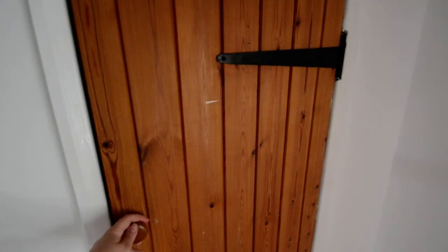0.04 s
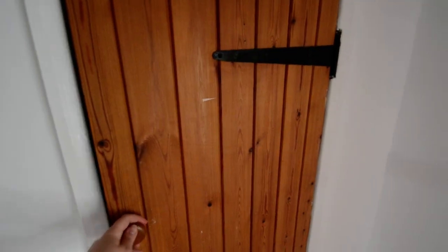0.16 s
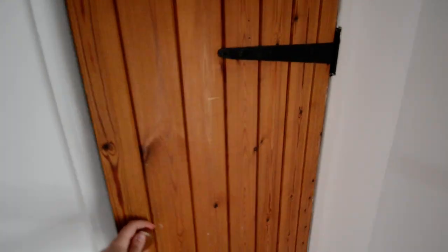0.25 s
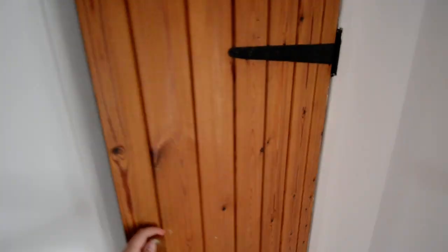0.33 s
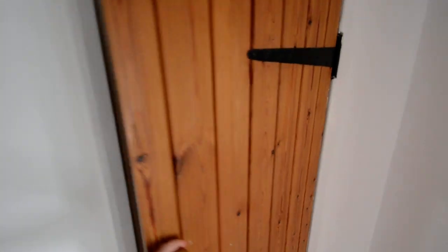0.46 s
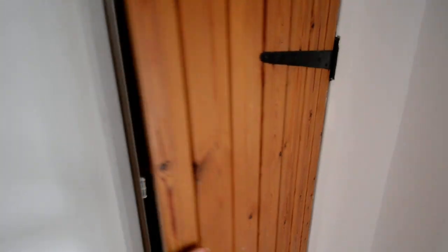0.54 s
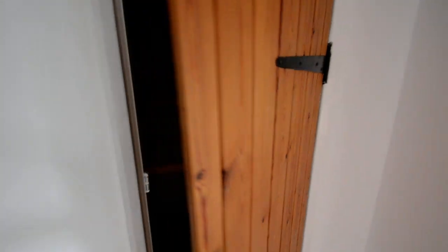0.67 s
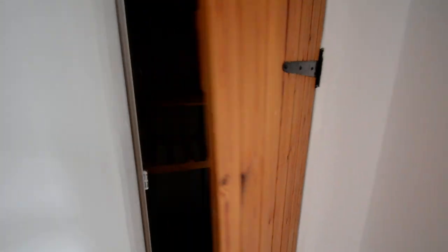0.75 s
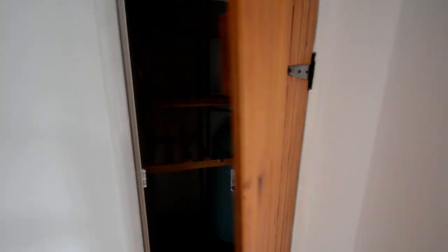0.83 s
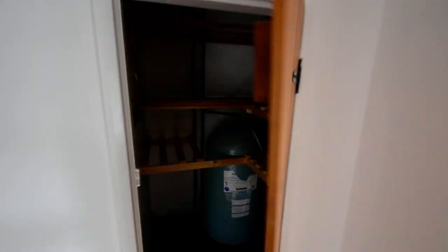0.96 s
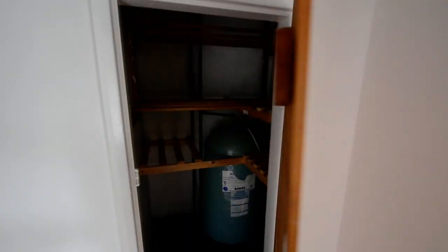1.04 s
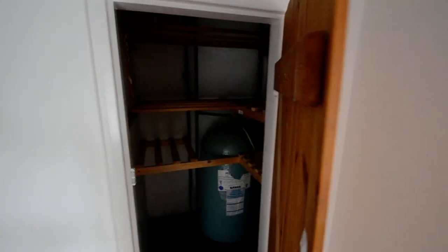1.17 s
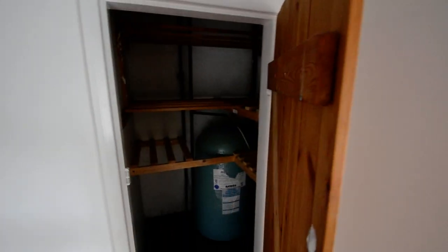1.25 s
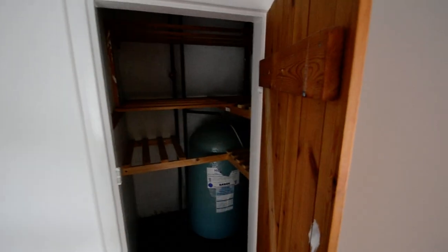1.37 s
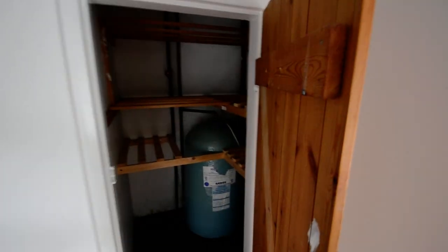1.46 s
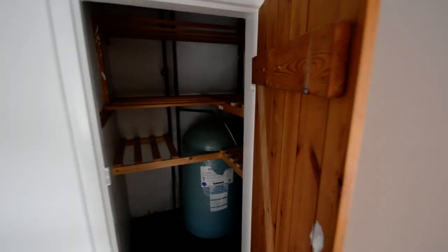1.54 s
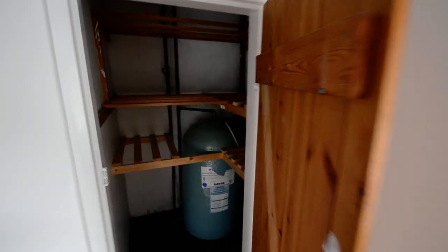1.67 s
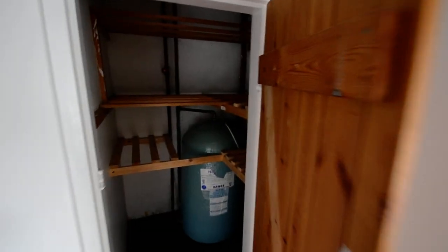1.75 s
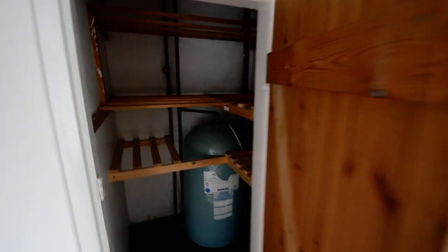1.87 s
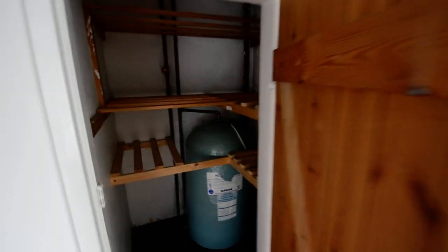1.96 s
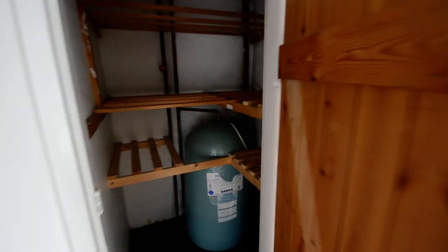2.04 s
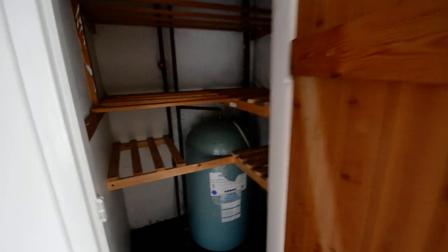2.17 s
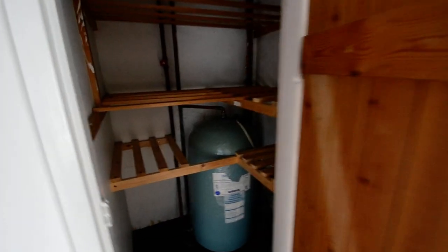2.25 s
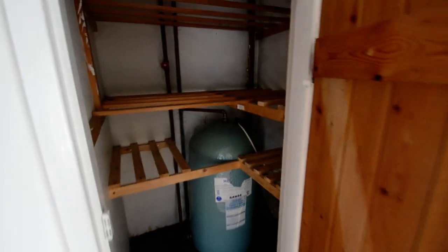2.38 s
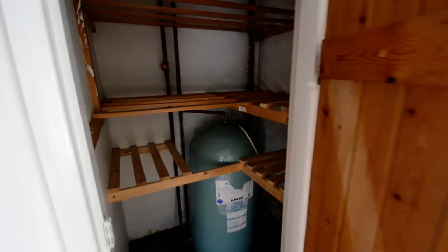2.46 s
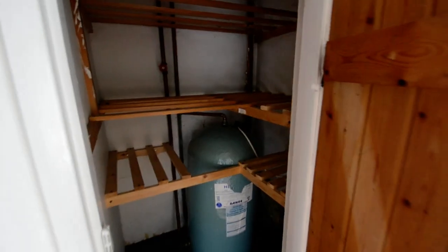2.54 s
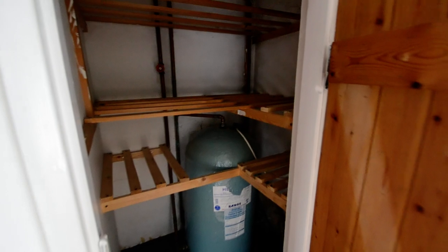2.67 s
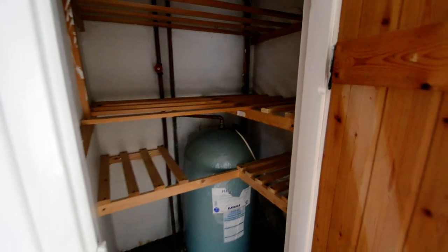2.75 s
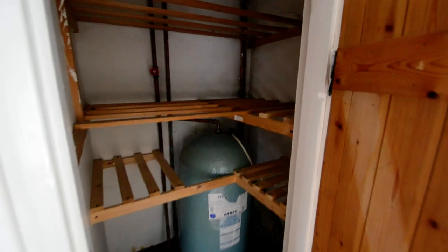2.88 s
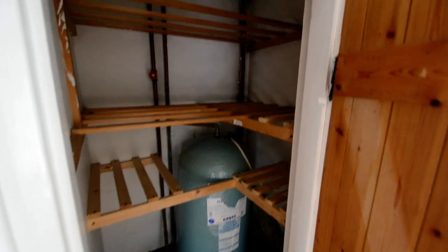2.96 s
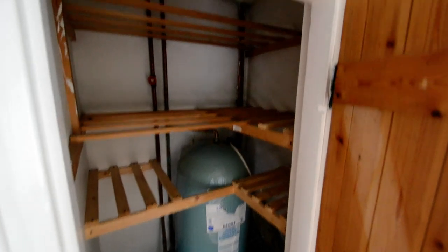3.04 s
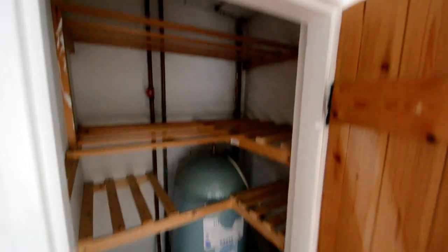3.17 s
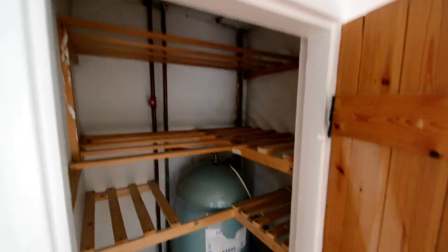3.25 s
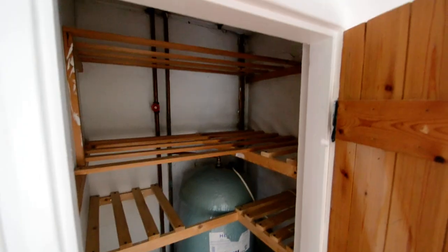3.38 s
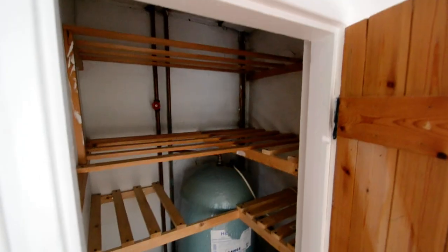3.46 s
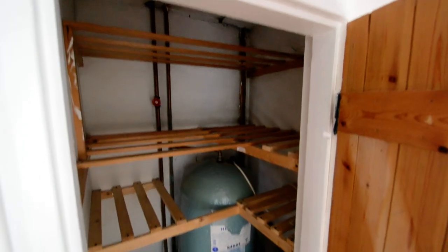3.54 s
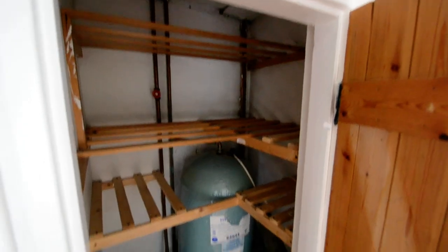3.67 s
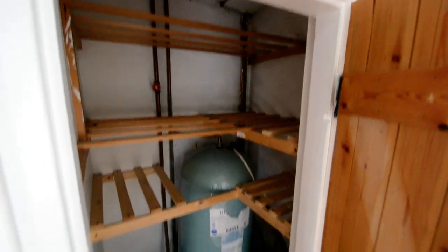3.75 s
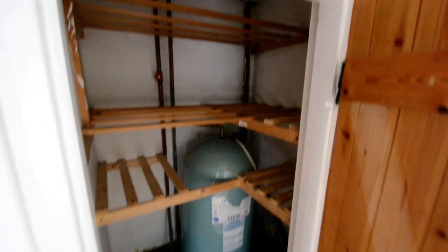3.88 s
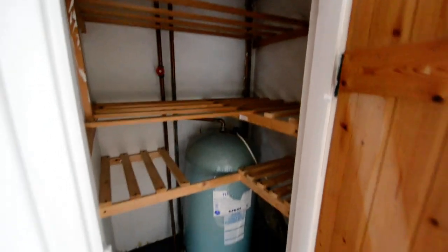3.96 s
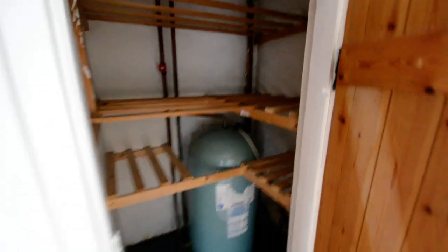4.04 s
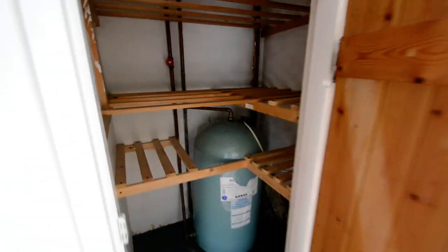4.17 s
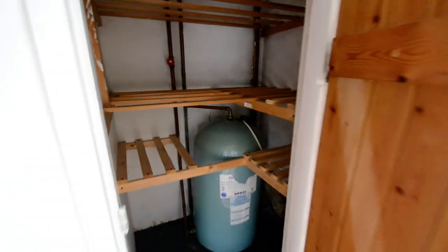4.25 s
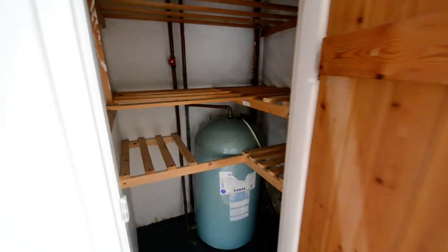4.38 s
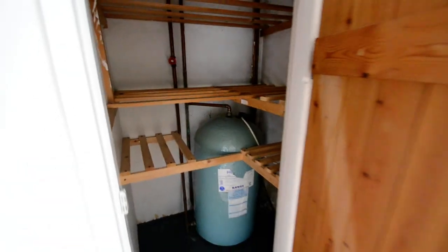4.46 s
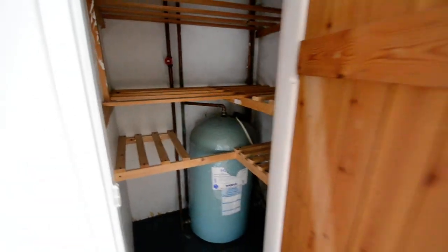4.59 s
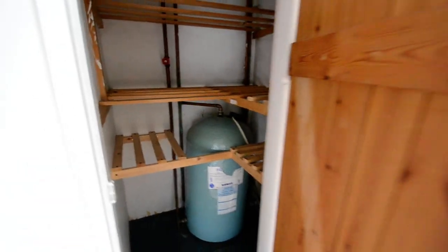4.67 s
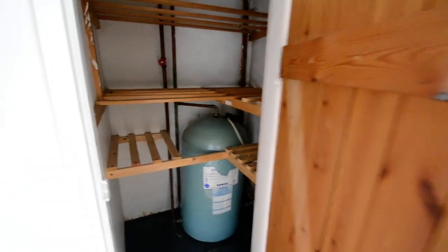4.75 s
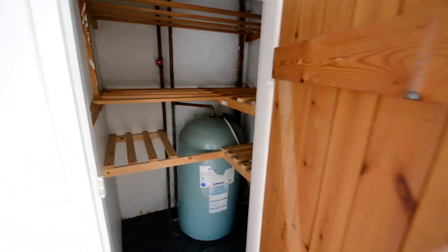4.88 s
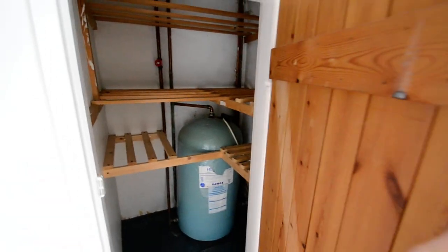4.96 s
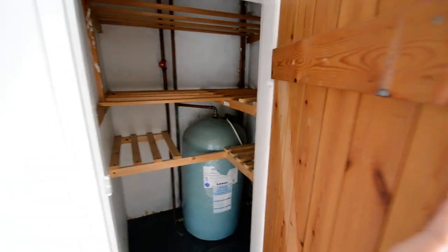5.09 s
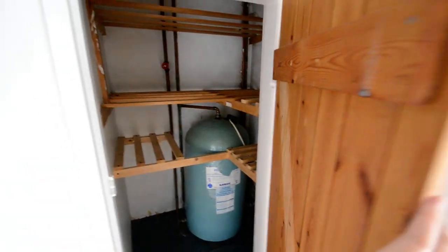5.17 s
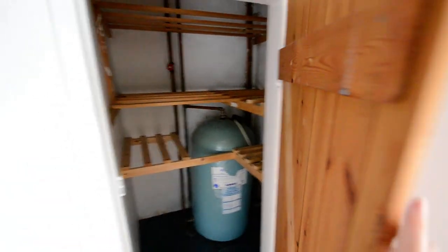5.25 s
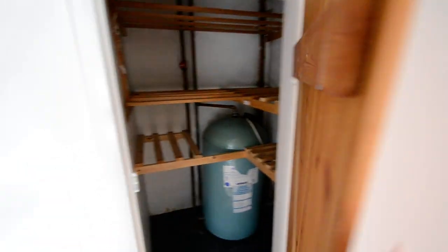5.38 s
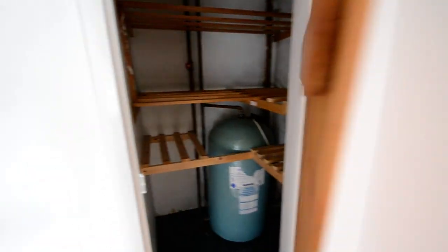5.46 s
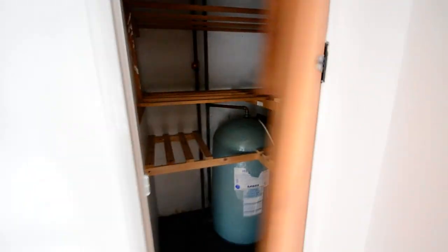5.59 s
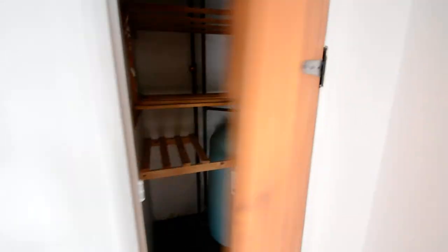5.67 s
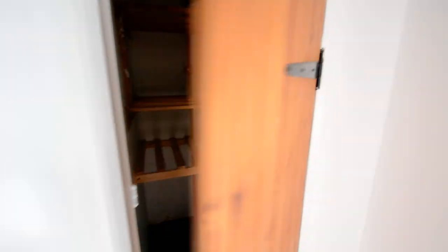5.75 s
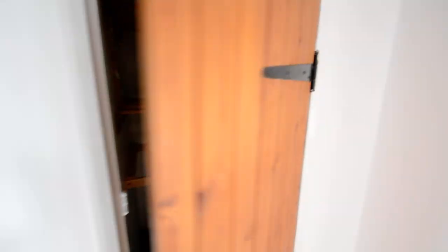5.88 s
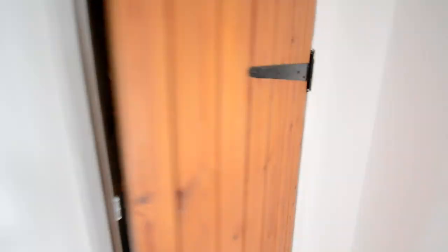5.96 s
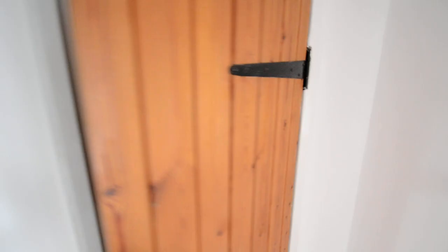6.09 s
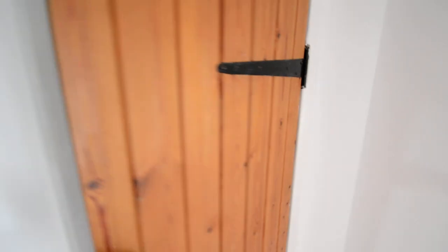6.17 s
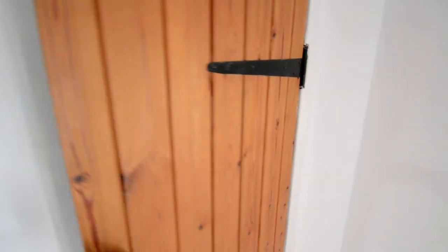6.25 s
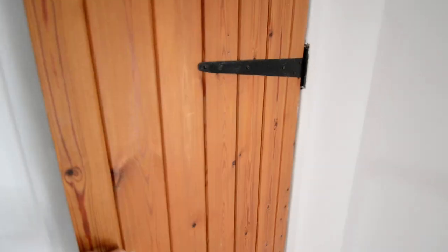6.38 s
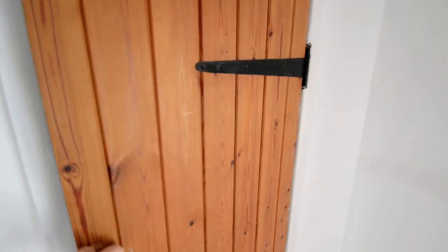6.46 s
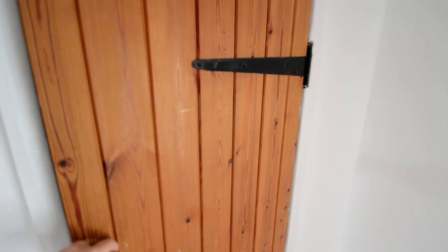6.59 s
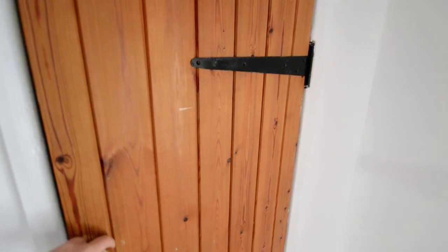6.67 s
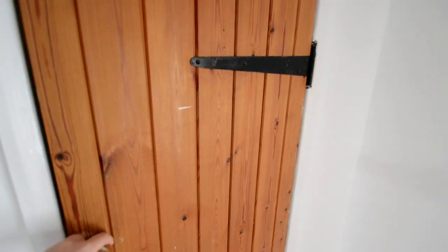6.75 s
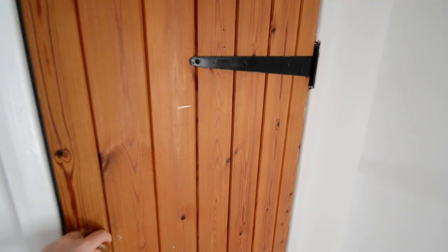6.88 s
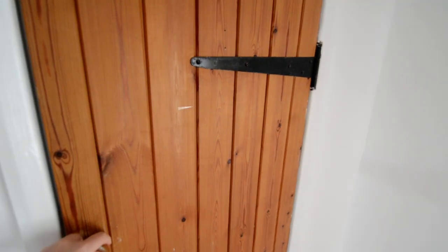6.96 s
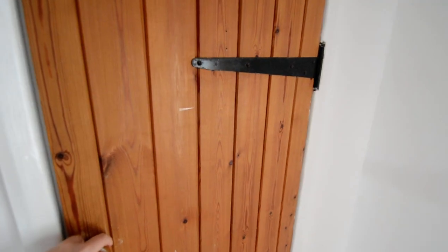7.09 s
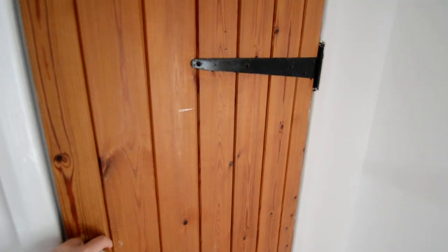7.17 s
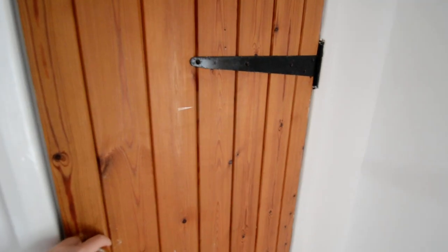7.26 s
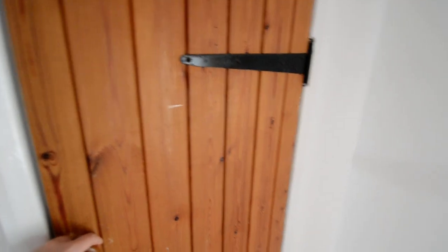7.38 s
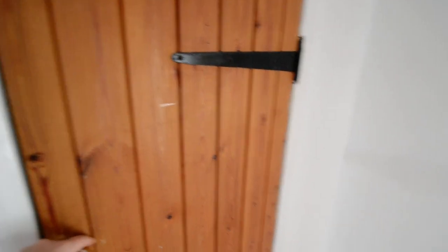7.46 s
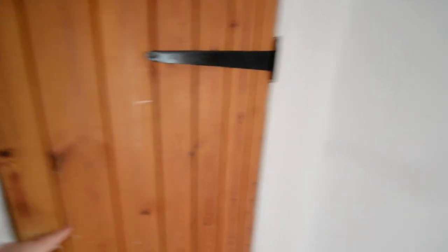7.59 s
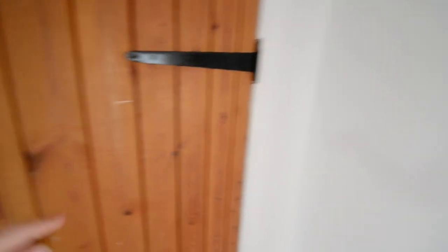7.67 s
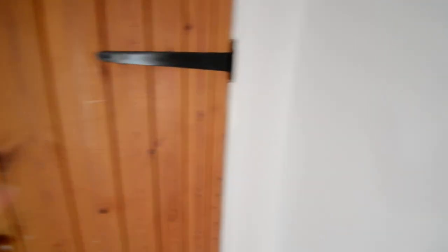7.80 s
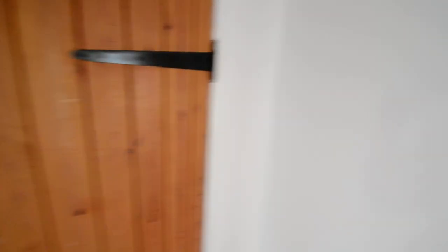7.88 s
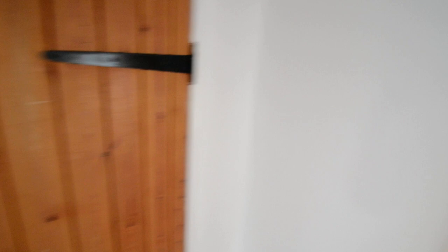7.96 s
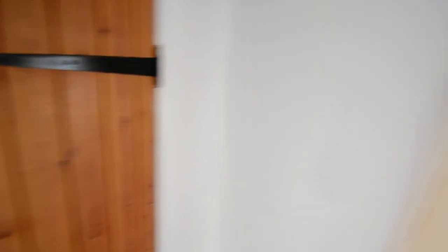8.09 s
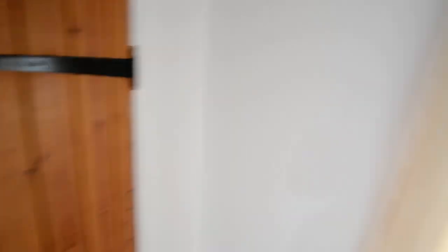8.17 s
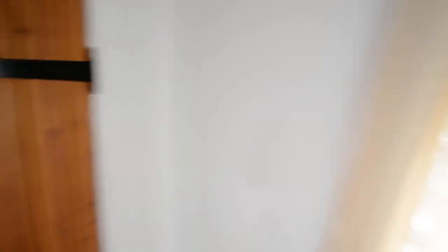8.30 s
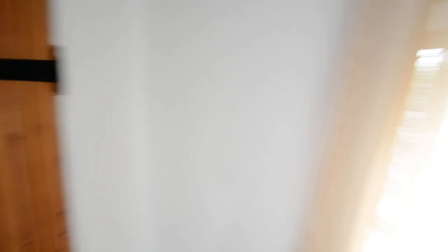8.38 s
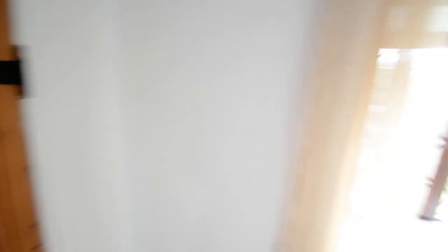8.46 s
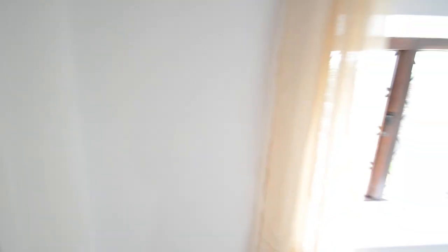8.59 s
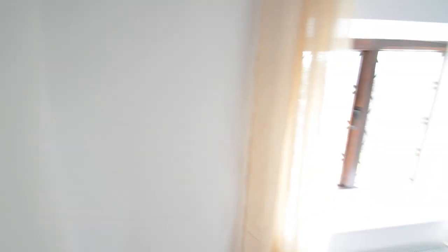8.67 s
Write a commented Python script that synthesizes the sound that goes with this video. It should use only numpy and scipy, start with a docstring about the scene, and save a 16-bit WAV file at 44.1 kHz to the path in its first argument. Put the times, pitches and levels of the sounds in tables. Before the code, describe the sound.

In a small, slightly echoing room, a wooden cupboard door opens with a run of light knocks and dull thumps. Fingertips tap and rub on the hand-held microphone, dry and close. The hinge gives a faint squeak and a clunk as the door closes, then the metal catch snaps sharply, the loudest sound. A wooden knock, two clinks of a loose knob and some clothing rustle follow.

```python
"""First a plank cupboard door knocks and drums against its frame as it is pulled open in a small bare room.
While someone looks inside, the hinge clunks and squeaks, and fingers tick and slide on a hand-held camera.
Then the door is pushed shut: more knocks, the catch snaps and the loose knob clinks.
Each blow is a tiny burst of force that makes wood or metal ring and the room echo.
Underneath are rustling clothes, dull thumps, a faint moan and a quiet hiss."""
import sys
import numpy as np
from scipy import signal
from scipy.fft import rfft, irfft
from scipy.io import wavfile
from scipy.ndimage import uniform_filter1d

SR = 44100
rng = np.random.default_rng(int(sys.argv[2]) if len(sys.argv) > 2 else 0)


def pcm_store(signal):
    """Save signal as 16-bit PCM."""
    levels = np.round(np.clip(np.atleast_2d(signal), -1, 1) * 32767)
    wavfile.write(sys.argv[1], SR, levels.astype(np.int16).T)


N = 384993

# Blows on door and frame. Each row: start in seconds, level in dB, favoured pitch in Hz,
# focus (dB lost per octave away from that pitch), crack level in dB, thud level in dB.
DOOR_KNOCKS = [(0.0, -37.5, 487, -7, -41.5, -52), (0.137, -29, 1490, 8.5, -36, -36.5),
               (0.221, -31.5, 920, 9, -60, -55), (0.232, -38, 880, 11, -65, -58),
               (0.335, -37, 910, 19, -66, -44), (0.356, -38.5, 815, 8.5, -72, -64),
               (0.447, -36.5, 920, 13, -61, -50), (0.509, -48, 1030, 15, -72, -48.5),
               (0.673, -54, 566, 15, -70, -79), (1.2295, -39.5, 1480, 8, -56, -52),
               (1.2395, -40, 950, 16, -67, -60), (1.316, -40, 1900, 9.5, -50, -79),
               (1.329, -40, 925, 12, -76, -59), (1.529, -59, 2000, 20, -59, -58),
               (1.822, -54, 1560, 6, -61.5, -72), (1.957, -54.5, 1470, 4, -64, -67),
               (2.113, -51.5, 1260, 15, -77, -75), (3.954, -46.5, 1000, 4, -54, -54),
               (5.03, -33.5, 970, 5, -41, -50.5), (5.62, -54.5, 450, 6, -72, -55),
               (6.692, -57, 1060, 0, -64, -73), (6.860, -42.5, 900, -3, -48, -38),
               (7.049, -33.5, 970, 6.5, -48.5, -53), (7.418, -28.5, 1660, 9, -47.5, -33.5),
               (8.282, -34, 377, 7, -49.5, -45), (8.377, -29.5, 2070, 2.5, -35, -71),
               (8.657, -46, 694, 9, -57, -45.5)]
# Blows on hinge, catch and knob, with the same columns.
HINGE_CLUNKS = [(0.889, -42.5, 1270, 2.5, -48, -47), (6.003, -42.5, 1340, 0, -43.5, -77)]
CATCH_SNAPS = [(6.8775, -16, 1963, 10.5, -44, -36.5), (6.8815, -18, 1710, 9, -45, -42),
               (6.888, -16, 1960, 9.5, -48.5, -39), (7.1016, -8, 5180, 5, -10, -31)]
KNOB_CLINKS = [(7.5948, -21.5, 2380, 7, -71, -36.5), (7.8062, -25.5, 2280, 9, -57, -38.5)]
# The tones each object rings at. Each row: pitch in Hz, width in Hz (narrow rings longer), strength in dB.
DOOR_TONES = [(375, 127, -3.5), (600, 199, 3.5), (636, 274, 3.5), (764, 220, 0), (1062, 140, -2.5),
              (1280, 120, -1.5), (1455, 206, -3.5), (1810, 370, -4.5), (2294, 200, -4), (2470, 290, -5),
              (3280, 940, -8.5), (4330, 330, -6.5), (5350, 1200, -18.5)]
THUD_TONES = [(90, 40, -26.5), (155, 90, -6), (286, 72, 0), (399, 25, 8), (614, 39, 8)]
PANEL_TONES = [(273.3, 4.3, 14), (72.5, 16, -8)]
HINGE_TONES = [(494, 73, -4.5), (890, 30, -3), (1250, 55, 5), (2000, 82, -1), (2520, 220, -7),
               (3250, 220, -6)]
SHELL_TONES = [(1450, 380, 3.5), (2743, 254, 10), (3450, 680, -0.5), (4680, 670, 0), (6530, 180, -12),
               (6850, 620, -19), (9580, 2170, 2), (10830, 2500, -1.5)]
CATCH_TONES = [(810, 310, 3.5), (1150, 100, -2.5), (1400, 890, -0.5), (2037, 580, 13), (2160, 597, 10.5),
               (2546, 53, 2.5), (3440, 1180, -0.5), (4120, 810, -1), (5000, 330, -3), (5970, 660, -8.5),
               (6440, 300, -23.5), (9900, 1200, -17.5)]
KNOB_TONES = [(800, 60, 3.5), (1290, 440, -13), (2038, 293, -1.5), (2242, 273, 2), (2360, 210, -2),
              (4050, 290, -15), (4430, 240, -15), (6360, 560, -32)]
# How long the room rings. Each row: pitch in Hz, seconds to fade by 60 dB.
ROOM_FADE = [(100, 0.92), (400, 0.76), (1100, 0.67), (2900, 0.57), (7700, 0.43), (12000, 0.3)]
# Echoes from near walls. Each row: delay in milliseconds, level in dB.
WALL_ECHOES = [(1.9, -10), (3.7, -11.5), (5.6, -17), (9.2, -20.5), (14.3, -13.5), (19.1, -6.5)]
# The tone colour of room hiss and of cloth. Each row: pitch in Hz, relative level in dB.
HISS_COLOUR = [(12, -56), (20, -27), (159, -8.5), (208, -7), (367, -3), (521, -6), (629, -4), (780, -30.5),
               (869, -20.5), (1170, -11.5), (1530, -14), (5000, -23.5), (12500, -54), (16200, -80),
               (22000, -120)]
RUSTLE_COLOUR = [(120, -28.5), (200, -13.5), (391, -7.5), (765, -1.5), (1800, -3.5), (4300, -13.5),
                 (6020, -20), (9780, -20), (11000, -27.5), (14300, -79), (22000, -120)]
# How loudly the clothes rustle. Each row: time in seconds, level in dB.
RUSTLE_LEVELS = [(0, -62), (1.12, -64), (1.5, -68.5), (2.19, -64.5), (2.29, -58), (2.38, -60.5),
                 (2.95, -68), (3.24, -65), (3.69, -69), (4.33, -68.5), (5.21, -62), (6.8, -69), (7.8, -59),
                 (7.95, -51), (8.2, -66.5), (8.46, -52), (8.6, -61.5), (8.73, -58)]
# Thumps of floor and door. Each row: time of the peak in seconds, level in dB.
LOW_THUMPS = [(0.0, -66), (0.14, -52), (0.22, -57), (0.34, -58), (0.5, -66), (0.63, -69), (1.0, -68.5),
              (5.03, -86), (5.64, -72), (6.22, -76), (6.9, -57), (7.1, -54), (7.49, -56), (7.63, -58),
              (7.72, -75), (7.8, -60), (7.93, -64), (8.05, -64.5), (8.16, -70), (8.29, -63.5), (8.41, -65),
              (8.73, -67)]
# Flat blows on the door panel. Each row: start in seconds, strength of the push in dB.
PANEL_PUSHES = [(0.138, -29), (7.101, -29), (7.421, -19.5)]
# Swells of moan and squeak. Each row: time of the peak in seconds, level in dB, fade in dB a second.
MOAN_SWELLS = [(1.6, -76, 54), (2.3, -69, 23), (3.87, -70.5, 24), (5.05, -61, 17), (6.15, -72.5, 11)]
SQUEAK_SWELLS = [(4.89, -71, 200), (5.33, -77, 53), (5.67, -82, 100), (6.055, -69, 300)]
# Finger taps on the camera shell. Each row: start in seconds, level in dB, favoured pitch in Hz,
# push on the microphone in dB, pitch of that push in Hz.
FINGER_TICKS = [(1.9091, -55, 2200, -64, 595), (2.2088, -32.5, 2670, -28.5, 620),
                (2.2314, -39.5, 2930, -40.5, 685), (2.5556, -43, 2840, -54, 557),
                (2.8374, -53, 2710, -44, 313), (3.1022, -37.5, 2900, -44, 303),
                (3.364, -53.5, 2650, -60, 519), (4.0227, -42, 2620, -50, 872),
                (4.043, -40.5, 2860, -46, 850), (4.158, -50, 2650, -46, 780),
                (4.164, -40, 3500, -37.5, 330), (4.178, -37, 9630, -42, 670), (4.1806, -60, 2420, -43, 428),
                (4.1875, -39, 2320, -36, 378), (4.1924, -51, 2540, -39, 336),
                (4.6049, -51.5, 3300, -50, 1700), (4.8872, -58, 6650, -50, 334),
                (6.0537, -50, 2070, -58, 546)]
# Fingers rubbing the shell. Each row: start and end in seconds, first and last level in dB,
# favoured pitch in Hz, focus in dB per octave.
FINGER_SLIDES = [(2.23, 2.286, -48, -60, 4870, 5), (2.307, 2.36, -58, -62, 5000, 2),
                 (2.428, 2.532, -65.5, -57, 5000, 0), (2.62, 2.82, -68, -58.5, 3000, 23),
                 (2.834, 2.878, -57, -65.5, 5000, 1), (3.1, 3.142, -45, -70.5, 5560, 7),
                 (4.037, 4.093, -51, -55, 4020, 4), (4.086, 4.141, -36.5, -39.5, 7900, 11),
                 (4.152, 4.169, -38, -33, 3400, 7), (4.17, 4.207, -31.5, -56, 8300, 8),
                 (4.619, 4.84, -63.5, -70, 1500, 22), (4.88, 4.93, -66, -78, 6700, 28),
                 (5.202, 5.387, -68, -64, 9000, 6.5), (7.822, 8.05, -61.5, -68, 8900, 3),
                 (8.216, 8.252, -68, -75.5, 9500, 24), (8.3, 8.343, -49, -62.5, 8970, -0.5),
                 (8.518, 8.634, -58, -59, 2930, -1)]


def gain_of(db):
    """Turns decibels into a number to multiply by."""
    return 10 ** (np.asarray(db) / 20)


def evened(x):
    """Scales a sound to an average power of 1."""
    return x / np.sqrt(np.mean(x ** 2) + 1e-20)


def packed(x):
    """Scales a sound so that its energy, packed into one millisecond, would have a power of 1."""
    return x * np.sqrt(SR / 1000) / np.linalg.norm(x)


def look_up(points, hz):
    """Reads between the rows of a table, with pitch spaced in octaves."""
    pitches, values = np.transpose(points)
    return np.interp(np.log(hz + 1), np.log(pitches + 1), values)


def add(mix, start_s, sound):
    """Mixes a sound in at its start time."""
    part = mix[max(round(start_s * SR), 0):][:len(sound)]
    part += sound[:len(part)]


def band(x, low_hz, high_hz):
    """Softens everything below and above two pitches."""
    sections = signal.butter(2, [low_hz, min(high_hz, SR / 2.1)], "band", fs=SR, output="sos")
    return signal.sosfilt(sections, x)


def ring(force, tones):
    """A force makes an object ring at each of its tones."""
    out = np.zeros(len(force))
    for k, (hz, width, db) in enumerate(tones):
        decay = np.exp(-np.pi * width / SR)
        pole = decay * np.exp(2j * np.pi * hz / SR)
        out += (-1) ** k * gain_of(db) * 2 * signal.lfilter([1 - decay], [1, -pole], force).real
    return out


def favoured(tones, hz, focus_db):
    """Weakens each tone by its distance in octaves from the pitch that a contact favours."""
    return [(pitch, width, db - max(focus_db, 0) * abs(np.log2(pitch / hz)))
            for pitch, width, db in tones]


def chatter(peak_ms):
    """The force of a contact: a cluster of tiny collisions that swells and dies."""
    age = np.arange(8000) / SR * 1000 / peak_ms
    return rng.standard_normal(len(age)) * age * np.exp(-age)


def shaped_noise(colour, patchy_db):
    """Noise of a given colour, with drifting louder and softer patches."""
    frames, hz = N // 256 + 5, np.fft.rfftfreq(1024, 1 / SR)
    real, imaginary, patches = rng.standard_normal((frames, 513, 3)).T
    patches = evened(uniform_filter1d(uniform_filter1d(patches, 12, 0), 14, 1))
    spectra = (real + 1j * imaginary) * gain_of(look_up(colour, hz)[:, None] + patchy_db * patches)
    return evened(signal.istft(spectra, nperseg=1024, noverlap=768)[1][:N])


def pitched_noise(hz, width_hz):
    """Noise narrowed twice around one pitch."""
    tone = [(hz, width_hz, 0)]
    return evened(ring(ring(rng.standard_normal(N), tone), tone))


def swells(peaks, rise):
    """A loudness curve of peaks, each growing `rise` times as fast as it fades."""
    t = np.arange(0, N + 64, 64) / SR
    power = sum(gain_of(db - fade * np.maximum(t - s, rise * (s - t))) ** 2 for s, db, fade in peaks)
    return np.interp(np.arange(N) / SR, t, np.sqrt(power))


def power_sum(parts):
    """One pulse that holds the added power of all the parts at every pitch."""
    log_gain = .5 * np.log(sum(abs(np.fft.fft(part)) ** 2 for part in parts) + 1e-14)
    return np.fft.ifft(np.exp(np.conj(signal.hilbert(log_gain)))).real


def blows(table, tones, peak_ms, facing_db):
    """Strikes an object. Gives the sound aimed at the listener and the smoother one spread all around."""
    direct, spread = np.zeros((2, N))
    click = signal.unit_impulse(8000)
    for s, db, hz, focus_db, crack_db, thud_db in table:
        def parts(force, tick):
            """The ringing body, a bright crack and the panel's low thud."""
            body = band(ring(force, favoured(tones, hz, focus_db)), hz / 4.2, hz * 9.5)
            crack = band(tick, 960, 29000)
            thud = ring(force, THUD_TONES)
            return (gain_of(db) * packed(body), gain_of(crack_db) * packed(crack),
                    gain_of(thud_db) * packed(thud))
        add(direct, s, gain_of(facing_db) * sum(parts(chatter(peak_ms), chatter(0.18))))
        add(spread, s + peak_ms / 1000, power_sum(parts(click, click)))
    return direct, spread


def room(direct, spread, tail_db):
    """Near walls echo the direct sound; the spread sound leaves a tail whose treble dies first."""
    reflections = np.zeros(SR)
    slots = np.arange(160, SR - 20, 20)
    reflections[slots + rng.integers(0, 20, len(slots))] = rng.choice([-1., 1.], len(slots))
    hz, t, spectra = signal.stft(reflections, SR, nperseg=256)
    fade = gain_of(-60 * t / look_up(ROOM_FADE, hz)[:, None])
    tail = signal.istft(spectra * fade, SR, nperseg=256)[1]
    age_s = np.arange(len(tail)) / SR
    tail *= 1 - np.exp(-age_s / 0.0037)  # reflections take a moment to build up
    tail *= 1 + 0.51 * np.exp(-age_s / 0.046)  # the near corner empties faster than the room
    early = signal.unit_impulse(2000)
    for ms, db in WALL_ECHOES:
        early[round(ms * SR / 1000)] += gain_of(db)
    late = gain_of(tail_db) * signal.fftconvolve(spread, tail / np.linalg.norm(tail))[:N]
    return signal.oaconvolve(direct, early)[:N] + late


def door_knocks():
    """Door and frame knock, and the wood rings briefly."""
    return room(*blows(DOOR_KNOCKS, DOOR_TONES, peak_ms=1.097, facing_db=2.0), tail_db=5.5)


def room_hiss():
    """The quiet hiss of the room."""
    return gain_of(-69.5) * shaped_noise(HISS_COLOUR, patchy_db=3.0)


def clothes_rustle():
    """Moving cloth makes a soft noise that grows and fades."""
    times, levels = np.transpose(RUSTLE_LEVELS)
    level_db = np.interp(np.arange(N) / SR, times, levels, right=-120)
    return gain_of(level_db) * shaped_noise(RUSTLE_COLOUR, patchy_db=1.5)


def low_thumps():
    """Floor and swinging door thump dully over a faint, steady rumble."""
    fade_db_per_s, rumble_db = 151, -92.5
    thumps = swells([(s, db, fade_db_per_s) for s, db in LOW_THUMPS], rise=1.8)
    return (thumps + gain_of(rumble_db)) * pitched_noise(hz=72.4, width_hz=39)


def panel_drumming():
    """After a flat blow, the door panel drums on at its two lowest tones."""
    force = np.zeros(N)
    for s, db in PANEL_PUSHES:
        add(force, s, gain_of(db) * signal.windows.hann(90))  # a soft push of 2 milliseconds
    return band(ring(force, PANEL_TONES), 50, 500)


def hinge_clunks():
    """The strap hinge clunks as it takes up its slack."""
    return room(*blows(HINGE_CLUNKS, HINGE_TONES, peak_ms=1.6, facing_db=-4.5), tail_db=0.5)


def faint_moan():
    """A faint low moan swells and fades."""
    return swells(MOAN_SWELLS, rise=1.74) * pitched_noise(hz=345, width_hz=130)


def finger_ticks():
    """Fingertips make the camera shell ring and push on the microphone, with no room echo."""
    out = np.zeros(N)
    for s, db, hz, push_db, push_hz in FINGER_TICKS:
        tick = ring(chatter(peak_ms=0.75), favoured(SHELL_TONES, hz, focus_db=9.0))
        push = ring(chatter(peak_ms=0.75), [(push_hz, 0.41 * push_hz, 0)])
        push = band(push, 0.19 * push_hz, 3200)
        add(out, s, gain_of(db) * packed(tick) + gain_of(push_db) * packed(push))
    return band(out, 150, 18000)


def finger_slides():
    """Skin sticks and slips on the camera shell, making it ring with an uneven rub."""
    out = np.zeros(N)
    for start, end, start_db, end_db, hz, focus_db in FINGER_SLIDES:
        count = round((end - start) * SR)
        grip = gain_of(1.2 * evened(uniform_filter1d(rng.standard_normal(count), 130)))
        rub = evened(ring(rng.standard_normal(count) * grip, favoured(SHELL_TONES, hz, focus_db)))
        loudness = gain_of(np.linspace(start_db, end_db, count)) * signal.windows.tukey(count, .5)
        add(out, start, rub * loudness)
    return band(out, 150, 18000)


def hinge_squeak():
    """Metal rubs on metal with a thin squeak as the door swings."""
    return swells(SQUEAK_SWELLS, rise=3.3) * pitched_noise(hz=4800, width_hz=70)


def catch_snaps():
    """The catch rides up in three jolts, then snaps home."""
    return room(*blows(CATCH_SNAPS, CATCH_TONES, peak_ms=0.51, facing_db=0.2), tail_db=1.5)


def knob_clinks():
    """The loose knob rattles with two clinks."""
    return room(*blows(KNOB_CLINKS, KNOB_TONES, peak_ms=0.76, facing_db=0.0), tail_db=3.5)


def scene():
    """Adds all the sounds into one channel."""
    mix = door_knocks() + catch_snaps() + knob_clinks() + hinge_clunks()
    mix += room_hiss() + hinge_squeak() + panel_drumming()
    mix += finger_ticks() + finger_slides()
    mix += faint_moan() + low_thumps() + clothes_rustle()
    return mix[None]


def record(dry):
    """The sound dips near 8 kHz, dulls above 11 kHz and is cut off above 13.3 kHz, with faint hiss."""
    hz = np.fft.rfftfreq(N, 1 / SR)
    colour_db = look_up([(7200, -1), (8050, -9), (8800, -2.5), (10600, -8.5), (11800, -33),
                         (13000, -40)], hz)
    coloured = irfft(rfft(dry) * gain_of(colour_db), N)
    treble_cut = signal.firwin(511, cutoff=13300, window=("kaiser", 9), fs=SR)
    heard = signal.oaconvolve(coloured, treble_cut[None], "same")
    return heard + gain_of(-104) * rng.standard_normal((1, N))


dry = scene()
out = record(dry)
pcm_store(out)
```